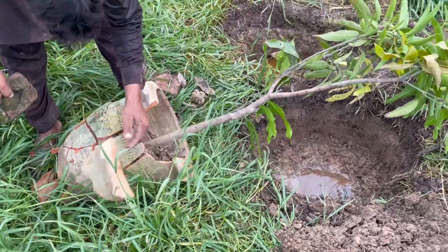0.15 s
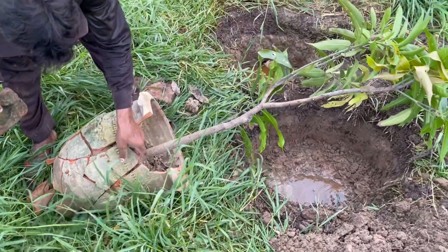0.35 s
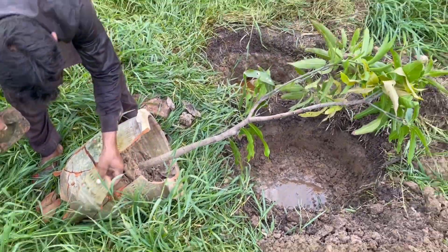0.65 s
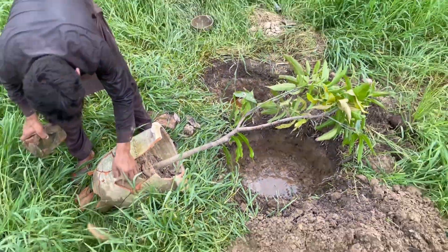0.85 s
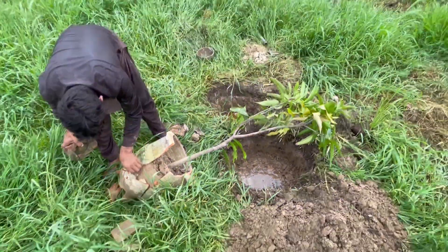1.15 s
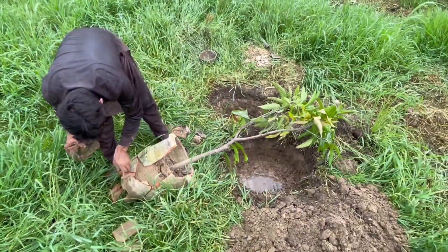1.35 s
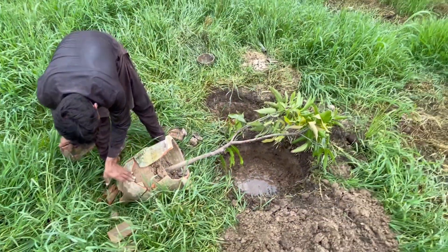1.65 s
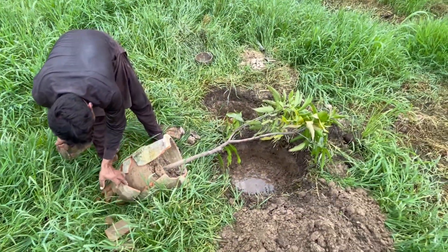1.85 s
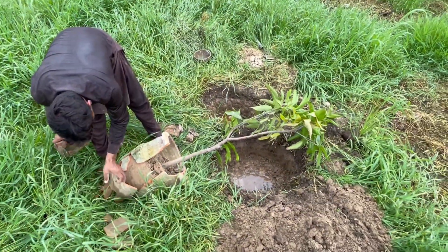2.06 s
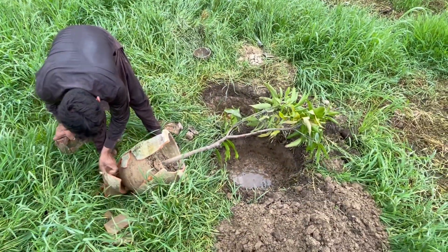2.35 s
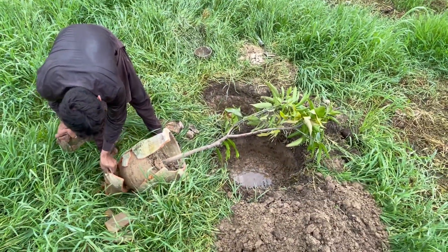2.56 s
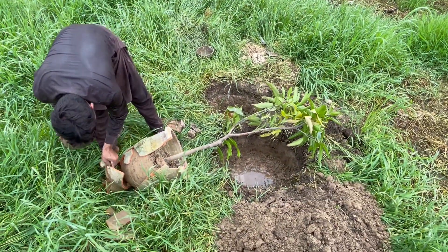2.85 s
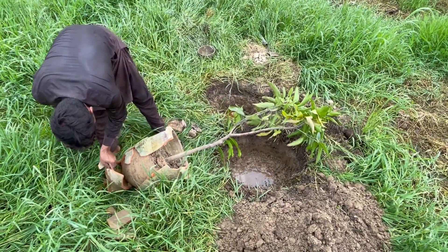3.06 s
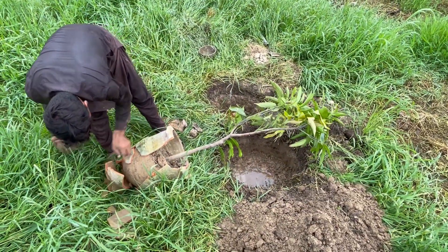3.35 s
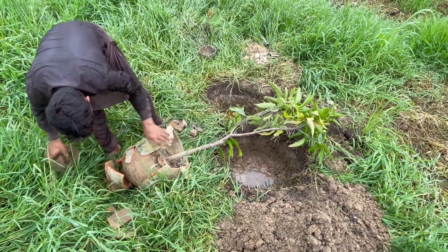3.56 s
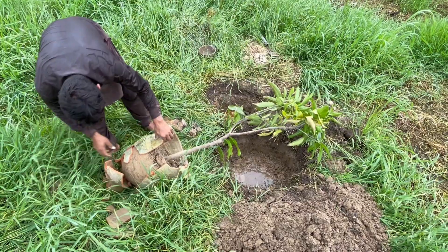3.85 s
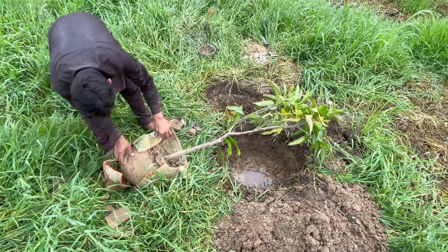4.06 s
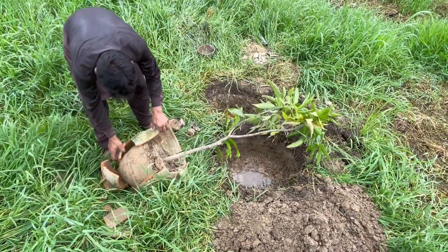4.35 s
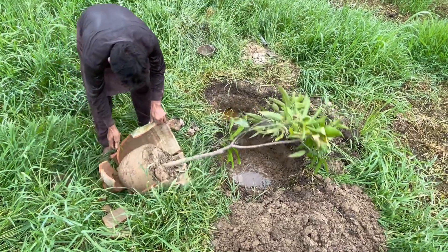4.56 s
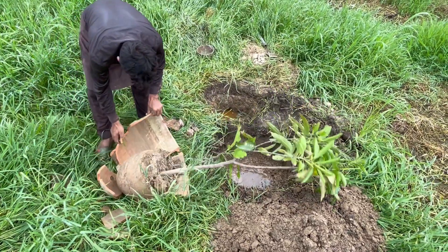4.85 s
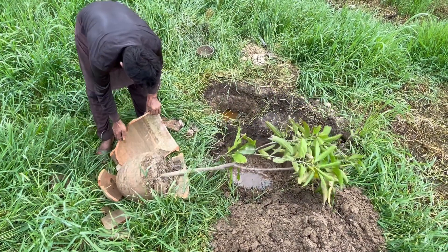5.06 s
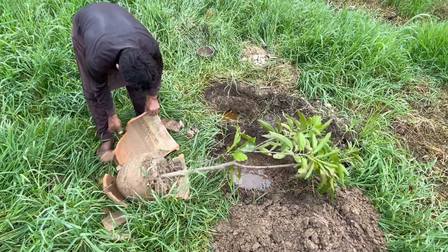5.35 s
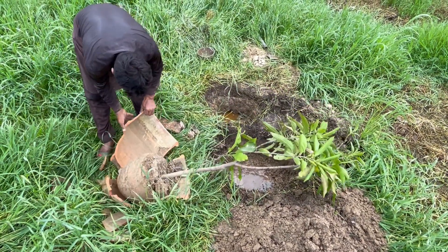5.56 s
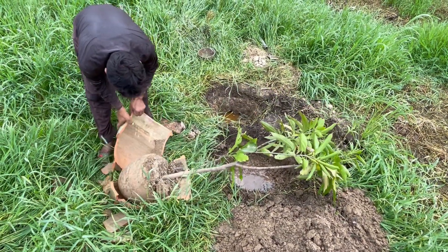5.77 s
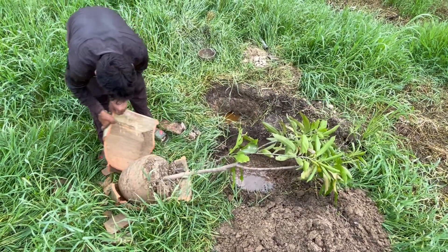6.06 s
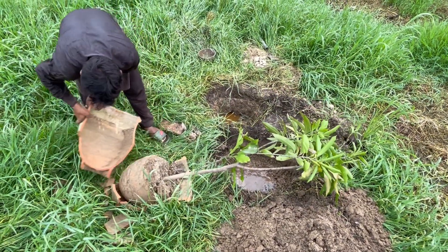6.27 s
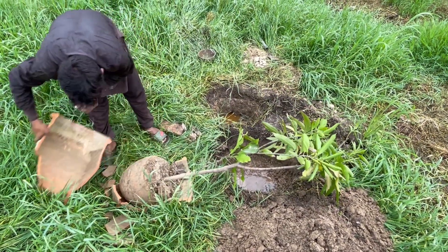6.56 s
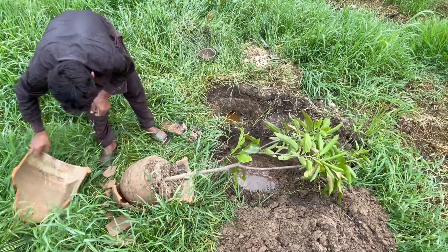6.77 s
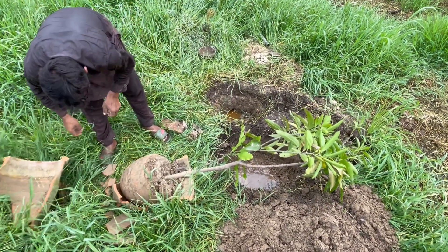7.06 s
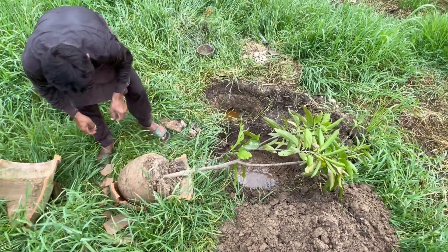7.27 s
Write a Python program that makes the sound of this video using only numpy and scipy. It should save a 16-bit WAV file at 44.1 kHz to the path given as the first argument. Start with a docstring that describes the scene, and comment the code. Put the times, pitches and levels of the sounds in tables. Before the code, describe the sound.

Hands pry pieces from a broken terracotta pot on a quiet farm. One bright, dry clink comes first, then earthy knocks, brief scrapes and pattering soil, with another sharp crack past the middle. After two short nasal bird calls, the large half is thrown into the grass with a heavy ceramic clatter and a spill of crumbs. Low distant engine hum, high insect hiss and open air surround the close stereo sound.

```python
"""Cracked clay pot pulled apart in long grass

Hands work at the pot: shards clink and knock as dying modes under a gritty crunch, soil crumbles as a patter
of rasping crumbs, and the big half is tossed down and rocks to rest. Swishing grass, insects and distant air
are shaped noise; a small bird calls in sliding harmonics; an engine and a low hum drone far off as wavering
tones. A handheld two-port microphone hears each layer with its own phase and level between the ports."""
import sys
import numpy as np
from scipy import signal
from scipy.fft import rfft, irfft
from scipy.io import wavfile
from scipy.ndimage import uniform_filter1d

SR = 44100
rng = np.random.default_rng(int(sys.argv[2]) if len(sys.argv) > 2 else 0)


def digitize_waveform(pressure):
    """Quantize a signal to 16-bit integers and store it at the path in sys.argv[1].

    Rows of a 2-D input are taken as channels; values are limited to [-1, 1].
    """
    field = np.atleast_2d(pressure).T
    bounded = np.clip(field, -1, 1)
    quanta = np.round(bounded * 32767).astype(np.int16)
    wavfile.write(sys.argv[1], SR, quanta)


N = 326781  # length [samples]
HZ = np.fft.rfftfreq(1024, 1 / SR)  # noise bins [Hz]
FRAMES = np.arange(N // 256 + 5) * 256 / SR  # noise frames [s]

# Distant rumble and hush, a relative spectrum set to AIR_DB overall: (frequency [Hz], density [dB per Hz])
AIR = [(15, -43), (25, -12), (107, 3), (220, -17), (680, -24), (1280, -32), (1810, -27), (2610, -31),
       (4130, -42), (4500, -41), (5850, -44), (9900, -120)]
AIR_DB = -51
# Insect bands without a pulse: (frequency [Hz], width [Hz], level [dB])
CHORUS = [(7510, 287, -60.5), (9750, 290, -56.5), (10570, 240, -68), (6200, 1800, -81)]
# Insect band that swells and fades: (frequency [Hz], width [Hz], level at THROB_TOP_S [dB])
THROB = [(5483, 252, -56.5)]
THROBS_PER_S, THROB_TOP_S = 1.72, 4.08
THROB_DEPTH_DB, THROB_GROWTH_DB = 7.5, 0.83  # dip between swells [dB], steady growth [dB per s]
# A soft hiss rises and sinks: (time [s], level [dB])
SWELLS = [(3.48, -61.5), (4.93, -60.5), (5.549, -62)]
SWELL_HZ, SWELL_WIDTH_HZ, SWELL_S = 3040, 370, 0.096
# Grass colour, relative: (frequency [Hz], density [dB per Hz])
GRASS = [(300, 0.5), (1500, -3.5), (3000, -5), (8000, -0.5), (11400, 4.5), (12600, -24), (16500, -40)]
# Hands and feet brush the grass: (peak time [s], level in 10.5-12.5 kHz [dB], swell and fade [s])
SWISHES = [(0.366, -52, 0.037), (.62, -60, 0.14), (.93, -50, 0.031), (1.62, -62.5, 0.075),
           (3.34, -61, 0.21), (3.73, -49, 0.088), (4.12, -60, 0.12), (4.4, -55, 0.072), (4.74, -57.5, 0.31),
           (5.45, -55.5, 0.075), (5.82, -60.5, 0.089), (6.22, -65, .15), (6.73, -47, 0.059),
           (6.95, -56.5, 0.24), (7.35, -59.5, 0.15)]
STIR_DB = -88  # the grass never lies quite still

# Low hum: (time [s], level [dB])
HUM = [(0, -71), (2.402, -60), (2.8, -53.5), (4.2, -47.5), (4.7, -56), (5.4, -55), (5.9, -51.5), (6.5, -55),
       (7.41, -56)]
HUM_HZ = 64.7
# Far engine: (time [s], cycle rate [Hz], level [dB])
ENGINE = [(0, 30.7, -76), (.6, 30.5, -52.5), (1.2, 29.4, -53), (1.6, 30, -74), (2.3, 37.3, -55.5),
          (2.75, 34.4, -48.5), (3.05, 33.2, -57), (3.55, 36.7, -49), (4.4, 32, -53), (4.8, 29, -49),
          (5.7, 27.2, -53), (6.2, 23, -58.5), (7.41, 20.2, -56.5)]
# Engine orders: (multiple of the cycle, relative level [dB])
ORDERS = [(3, -5), (4, 0.5), (5, -12.5)]
BOOM_HZ, BOOM_WIDTH_HZ, BOOM_DB = 100.2, 1.7, 8  # the exhaust lifts whichever order passes its note

# Bird calls: (time [s], level [dB], pitch [Hz], change of the late notes [dB], brightness [dB per harmonic])
CALLS_OF_BIRD = [(5.716, -49, 1426, -1, -0.5), (6.148, -46.5, 1440, -1.5, 0)]
# Notes of one call: (delay [s], relative level [dB], length [s])
NOTES = [(0, 0, .056), (0.064, -1.5, .046), (0.19, -11, .053), (.325, -20.5, 0.051)]
LATE_S = .1  # notes delayed more than this are late ones
# Voice of the bird: (harmonic, relative level before brightness and fading [dB])
BEAK = [(1, -9.5), (2, 2.5), (3, -3), (4, 4.5), (5, -0.5), (6, -10)]

# Dull low bumps, one of them the low body of a pot knock: (time [s], level [dB], frequency [Hz], t60 [s])
THUMPS = [(0.384, -36, 51, 0.13), (0.503, -19, 55, 0.06), (1.443, -36, 247, 0.078),
          (1.568, -31.5, 66.4, 0.14), (1.832, -31.5, 53.2, 0.28), (1.869, -37.5, 89.5, 0.29),
          (2.093, -28, 64.5, 0.26), (2.748, -37, 125, 0.28), (4.019, -31.5, 109.1, 0.17),
          (6.689, -43, 62, 0.33), (6.75, -37, 72, 0.14)]
# Soil colour, relative: (frequency [Hz], density [dB per Hz])
SOIL = [(150, 16.5), (400, 7), (900, 0.5), (1500, 8.5), (2000, 2), (3000, 1), (4300, -10.5), (7000, -8),
        (12000, -70)]
# Soil crumbling in the hands: (time [s], level [dB])
CRUMBLING = [(0, -100), (.76, -100), (.95, -60), (1.1, -54.5), (1.5, -60), (1.88, -51), (2.05, -52),
             (2.23, -52), (2.4, -57), (3.1, -56), (3.55, -63), (4.2, -52), (4.66, -53), (5.2, -60.5),
             (5.76, -60.5), (6.08, -52), (6.5, -65.5), (7.41, -61.5)]
SPILL_S, SPILL_DB, SPILL_RISE_S, SPILL_T60_S = 6.69, -37, 0.024, 0.75  # the landing shakes soil off the big half
# Ring of the pot: (frequency [Hz], relative level [dB], t60 [s])
POT = [(300, -10, .03), (470, -8, .03), (732, -6, .035), (920, -5, .035), (1061, -5, .03), (1250, -5, .035),
       (1540, -7, .035), (2083, -4, .03), (2400, -7, .025), (2875, -6, .025), (3257, -7, .022),
       (3600, -10, .022), (4700, -13, .02), (6966, -20, .025), (7900, -20, .025)]
# Crunch of rough clay, relative: (frequency [Hz], density [dB per Hz])
GRIT = [(40, -18), (150, -15), (400, -4), (1100, -7.5), (2300, 0), (3500, -5.5), (5000, -12.5), (8000, -13),
        (12000, -16.5), (16500, -40)]
LUMPS_DB, LUMP_S = 4, 0.0024  # rough edges catch and slip, so the crunch comes in grains

# Single clear notes ring in and between the knocks: (time [s], level [dB], frequency [Hz], t60 [s])
CLEAR_NOTES = [(1.034, -45, 1545, .25), (1.445, -26, 3265, .035), (1.445, -28, 2875, .035),
               (1.444, -23, 1535, .04), (5.108, -39, 1300, .07), (4.668, -42, 480, .1),
               (1.303, -37, 7030, .045), (1.961, -42, 4690, .04), (1.989, -43, 6510, .03),
               (2.026, -44, 4750, .03), (2.208, -43, 6500, .04), (2.842, -37, 3550, .045),
               (2.842, -37, 2500, .045), (3.179, -42, 8030, .02), (3.1956, -34, 7890, .05),
               (3.197, -38, 3100, .04), (3.23, -41, 7900, .04), (4.364, -36, 7100, .02),
               (4.433, -38, 6300, .02), (4.433, -36, 3400, .03), (6.81, -40, 5300, .04)]
# Pieces still held in soil knock together:
# (time [s], level [dB], added note [Hz], its level against the knock [dB], hardness [dB per octave])
KNOCKS = [(0.468, -34.5, 857, -7.5, 3), (0.473, -35.5, 560, -4, -21), (0.5095, -30, 600, -10, -2),
          (.99, -34, 3630, -8, 2), (1.134, -40.5, 930, -2, 2), (1.179, -35, 1516, -2, -3),
          (1.296, -40.5, 880, -4, -6), (1.443, -18, 1027, -9.5, -1.5), (1.4446, -17, 2120, 2, -1),
          (1.513, -36.5, 2040, -2, 3), (1.555, -31, 917, -10.5, 2.5), (1.841, -30, 1510, -5, -4.5),
          (1.881, -39, 1200, -12, -19), (1.913, -40, 644, -2, 1), (1.942, -41.5, 804, -1, -4),
          (1.962, -45, 860, -2, -2), (1.986, -41, 820, 3.5, -1), (2.016, -34.5, 927, -3, 2),
          (2.028, -31.5, 990, -12, -1.5), (2.175, -39, 1255, -4, 0), (2.205, -35, 945, -17, -3.5),
          (2.486, -37.5, 1254, -1.5, -5.5), (2.839, -29, 1253, -5.5, 20), (2.847, -30.5, 730, -9, 2),
          (3.116, -32.5, 1252, -2.5, -8.5), (3.179, -37.5, 740, -6, -5), (3.197, -30, 2460, 2, -1.5),
          (3.199, -29.5, 1510, 5.5, -7), (3.219, -34.5, 1235, -14, 1), (3.265, -37, 747, -8, -7.5),
          (4.242, -35, 1301, -13, -5), (4.267, -35.5, 760, -16, 0), (4.327, -43.5, 650, -2, -8),
          (4.345, -40, 2830, 1, 1), (4.364, -17.5, 4770, -3.5, -0.5), (4.374, -28, 930, 0, -8.5),
          (4.388, -30.5, 4490, -5, -9), (4.424, -38, 610, -2, -10), (4.433, -29.5, 910, -4.5, -1),
          (4.472, -38, 1550, -7, -3), (4.522, -39, 1280, -9, -4), (4.559, -35.5, 1262, 6, -1),
          (4.619, -34.5, 1317, -13, -1), (4.658, -37.5, 950, -6, 3), (4.668, -38, 1290, 1, -4.5),
          (4.688, -42.5, 960, 1, -5), (4.795, -42, 1290, 2, 1), (4.824, -39.5, 1291, -3, 11),
          (5.107, -31.5, 2708, -4, 8)]
KNOCK_T60_S, RING_SHORTENS = 0.047, 0.49  # t60 at 1 kHz; it goes as pitch to the minus RING_SHORTENS
KNOCK_GRIT_DB, KNOCK_GRIT_T60_S = -2, 0.055
SOIL_DAMPS_HZ = 6300  # packed soil cushions the knocks and dulls their treble
# A small free shard is struck: (time [s], peak [dB])
SHARD_BLOWS = [(.578, -42), (0.9276, -5.5)]
# Ring of the shard: (frequency [Hz], relative level [dB], t60 [s])
SHARD = [(506, -30, 0.014), (910, -8, 0.0076), (1153, 13.5, 0.008), (1546, -6, 0.097), (2160, -23, .12),
         (2516, -2, 0.15), (3080, -9.5, 0.11), (3625, -8.5, 0.063), (3740, -21, 0.093), (4150, -8, 0.056),
         (4700, -11, 0.035), (5150, -4.5, 0.024), (5980, 0, 0.027), (7740, -13.5, 0.019),
         (8660, -13, 0.014)]
# The big half lands, rocks and settles: (time [s], peak [dB], lift of the middle modes [dB],
# hardness [dB per octave], grit [dB], grit t60 [s])
HALF_BLOWS = [(6.686, -6.5, -5, 0, -4, 0.03), (6.6908, -9.5, -5, -2.5, -10, 0.061),
              (6.712, -20, -9, -3, -3.5, 0.18), (6.7365, -11, 11, -3, -8.5, 0.049),
              (6.7435, -11.5, 13.5, -2.5, -9.5, 0.059), (6.751, -10, 5, -4.5, -17, 0.067),
              (6.762, -29, -2, -1, 4, 0.051), (6.766, -32, -4, -3.5, 2, 0.023),
              (6.789, -32, -4, -0.5, 0, 0.15), (6.81, -35.5, 3, -2, 6, 0.067),
              (6.866, -25.5, -12, -6.5, -22, 0.054)]
# Ring of the big half: (frequency [Hz], relative level [dB], t60 [s])
HALF = [(187.3, -6.5, 0.045), (285, 0, 0.051), (336, -18, 0.42), (394, 5, 0.05), (447, 1.5, 0.05),
        (562, -2, 0.024), (696, -12, 0.083), (880, -3.5, 0.063), (1023, -4.5, 0.097), (1236, -2.5, 0.13),
        (1378, -16, 0.27), (1970, -5, 0.07), (2400, -15.5, 0.18), (2600, -9, 0.057), (3400, -0.5, 0.032),
        (4070, -12, 0.046), (4370, -11, 0.044), (4720, -2, 0.047), (5330, -4, 0.047), (6440, -13, 0.039)]
MIDDLE_HZ, MIDDLE_OCTAVES = 920, 0.4  # blows on the rim reach these modes best
CHATTER_DB, CHATTER_S = 3.2, .012  # the rocking half touches grass and soil, so each mode flutters

# Port pair for the open field: (frequency [Hz], left leads [rad], left-right [dB], likeness [0-1])
FIELD = [(29.8, -1.5, -2, 0.54), (65, 0.5, 3, 0.84), (191, 0.34, 2, 0.84), (725, 1.1, 2, 0.7),
         (2140, 1.44, 0.5, 1), (5500, 0.89, 2, 0.053), (8850, 1.5, 0, 1), (9315, -2.5, -2, 0.8),
         (9710, -2.5, 1, 1), (11680, -5, 0, 0.55), (16500, -1, -1, 0.63)]
# Port pair for the work nearby: (frequency [Hz], left leads [rad], left-right [dB])
NEAR = [(50, 0, 3), (350, .8, 5), (800, 1.8, 12), (1300, 2.3, 7), (1900, 3.1, -3), (2400, 6.3, 0),
        (3200, 7.9, 4), (4500, 12, 3), (6000, 13.5, 3), (8600, 18.9, -2), (12000, 12.6, 0), (16500, 4.2, 0)]
# Bumps reach the two ports unevenly: (frequency [Hz], left leads [rad], left-right [dB])
BODY = [(30, 1.2, 0), (150, 0.9, 6)]
# The pickup narrows early on, then opens: (time [s], narrow share [0-1])
NARROW = [(0, 0.16), (.45, 0.84), (.86, 0.18), (.915, 0.14)]
ECHO_DB, ECHO_T60_S = -6, 0.041  # ground, legs and stems scatter the nearby sound, differently to each port
# Overall tone, the lowest bass and the top treble softened: (frequency [Hz], gain [dB])
TONE = [(20, -8), (40, -1), (12300, 1.5), (13300, -17), (16500, -9)]
EDGE_HZ = 16000  # top of the band


def amp(db):
    """Amplitude from decibels."""
    return 10 ** (np.asarray(db) / 20)


def evened(x):
    """Scales to an RMS of 1."""
    return x / np.sqrt(np.mean(abs(x) ** 2) + 1e-20)


def read(rows, at, warp=np.log1p):
    """Every column of a table at the given places."""
    key, *columns = np.transpose(rows)
    return np.array([np.interp(warp(at), warp(key), c) for c in columns])


def add(mix, s, sound):
    """Lays a sound into the mix at a time in seconds."""
    part = mix[round(s * SR):][:len(sound)]
    part += sound[:len(part)]


def wander(shape, size):
    """Smooth random drift of RMS 1, averaged twice over so many samples."""
    once = uniform_filter1d(rng.standard_normal(shape), size)
    return evened(uniform_filter1d(once, size))


def colour(x, rows, tilt=0):
    """Filters by a table of (frequency [Hz], gain [dB]) and a tilt in dB per octave."""
    hz = np.fft.rfftfreq(x.shape[-1], 1 / SR)
    gain_db = read(rows, hz)[0] + tilt * np.log2((hz + 200) / 1200)
    return irfft(rfft(x) * amp(gain_db), x.shape[-1])


def ports(x, pair):
    """One sound as the two ports hear it: shifted apart, their sum kept level unless they nearly cancel."""
    lead, balance_db = read(pair, np.fft.rfftfreq(N, 1 / SR))[:2]
    half = amp(balance_db / 2) * np.exp(.5j * lead)
    level = np.maximum(abs(half + 1 / half) / 2, .5)
    return irfft(rfft(x) * np.array([half, 1 / half]) / level, N)


def field_noise(level, patchy_db):
    """Noise of the given level (bins x frames) with drifting patches, partly alike at both ports."""
    a, b, c, d, patches = rng.standard_normal((len(FRAMES), len(HZ), 5)).T
    patches = uniform_filter1d(patches, size=8, axis=0)
    patches = evened(uniform_filter1d(patches, size=10, axis=1))
    lead, balance_db, like = read(FIELD, HZ)[:, :, None]
    like = np.clip(like + (1 - like) * read(NARROW, FRAMES, np.asarray), 0, 1)
    right = a + 1j * b
    left = (like * right + np.sqrt(1 - like ** 2) * (c + 1j * d)) * np.exp(1j * lead)
    pair = np.array([left * amp(balance_db / 2), right / amp(balance_db / 2)])
    pair = pair * level * amp(patchy_db * patches)
    unit = 1 / np.sqrt(np.mean(signal.istft(right, nperseg=1024, noverlap=768)[1] ** 2))
    return unit * signal.istft(pair, nperseg=1024, noverlap=768)[1][:, :N]


def insect_band(hz, width):
    """A bell-shaped noise band; its power has the given standard deviation in Hz."""
    return evened(np.exp(-.25 * ((HZ - hz) / width) ** 2))[:, None]


def insects():
    """Power of the insect bands, one of them throbbing and growing, and of the soft hiss."""
    power = sum((amp(db) * insect_band(hz, width)) ** 2 for hz, width, db in CHORUS)
    since_top = FRAMES - THROB_TOP_S
    swell_db = THROB_DEPTH_DB * (np.cos(2 * np.pi * THROBS_PER_S * since_top) - 1) / 2
    swell_db += THROB_GROWTH_DB * since_top
    for hz, width, db in THROB:
        power = power + (amp(db + swell_db) * insect_band(hz, width)) ** 2
    for s, db in SWELLS:
        hiss = amp(db) * insect_band(SWELL_HZ, SWELL_WIDTH_HZ)
        power = power + hiss ** 2 * np.exp(-((FRAMES - s) / SWELL_S) ** 2)
    return power


def swishing(t):
    """Each swish swells and fades evenly about its peak, over a faint stir."""
    swishes = sum(amp(db - 9.1 * (abs(t - s) / span) ** 0.73) ** 2 for s, db, span in SWISHES)
    return np.sqrt(amp(STIR_DB) ** 2 + swishes)


def field():
    """Rumble, insects and swishing grass add as powers."""
    air = amp(AIR_DB) * evened(amp(read(AIR, HZ).T))
    grass = amp(read(GRASS, HZ).T)
    top = (HZ > 10500) & (HZ < 12500)  # the band that sets the grass level
    grass = grass / np.sqrt(np.mean(top * grass[:, 0] ** 2)) * swishing(FRAMES)
    return field_noise(np.sqrt(air ** 2 + insects() + grass ** 2), patchy_db=2.1)


def hum():
    """One low tone, unsteady in pitch and level."""
    turns = np.cumsum(HUM_HZ * (1 + 0.0394 * wander(N, size=9000))) / SR
    level_db = read(HUM, np.arange(N) / SR, np.asarray)[0] + 3.15 * wander(N, size=5000)
    return np.sqrt(2) * amp(level_db) * np.sin(2 * np.pi * turns)


def engine():
    """Low orders of the firing cycle, wavering a little in pitch; the exhaust note boosts them in passing."""
    hz, level_db = read(ENGINE, np.arange(N) / SR, np.asarray)
    turns = np.cumsum(hz * (1 + 0.007 * wander(N, size=2500))) / SR
    out = np.zeros(N)
    for k, db in ORDERS:
        boom_db = BOOM_DB * np.exp(-.5 * ((k * hz - BOOM_HZ) / BOOM_WIDTH_HZ) ** 2)
        tone = np.sin(2 * np.pi * (round(k) * turns + rng.random()))
        out += np.sqrt(2) * amp(level_db + db + boom_db) * tone
    return out


def bird_note(hz, length, bright_db, lift=.04, fall=.33, knee=3.0):
    """A nasal note that starts a little flat, holds, then slides down; the upper harmonics fade first."""
    u = np.arange(round(length * SR)) / (length * SR)  # 0-1 through the note
    turns = np.cumsum(hz * (1 - lift * np.exp(-u / 0.13) - fall * u ** knee)) / SR
    note = 0
    for k, db in BEAK:
        fade_db = (15.0 + 24.0 * (k > 3)) * u ** 2.0
        note = note + amp(db + bright_db * k - fade_db) * np.sin(2 * np.pi * k * turns)
    return evened(note) * signal.windows.tukey(len(u), .45)


def bird():
    """Calls of several notes, with a noise-like tail of echoes thrown back by the bushes."""
    out = np.zeros(N)
    for s, db, hz, late_db, bright_db in CALLS_OF_BIRD:
        for lag, note_db, length in NOTES:
            level = amp(db + note_db + late_db * (lag > LATE_S))
            add(out, s + lag, level * bird_note(hz, length, bright_db))
    echoes = rng.standard_normal(9000) * amp(-60 * np.arange(9000) / SR / 0.24)
    return out + amp(-3.5) * signal.oaconvolve(out, echoes / np.linalg.norm(echoes))[:N]


def thumps():
    """Each bump is a soft low push: a sine that rises fast and dies away."""
    out, t = np.zeros(N), np.arange(SR // 2) / SR
    for s, db, hz, t60 in THUMPS:
        push = amp(db - 60 * t / t60) * (1 - np.exp(-t / 0.0035))
        add(out, s, push * np.sin(2 * np.pi * hz * t))
    return out


def crunch(t, hardness, t60):
    """Grainy noise of rough clay edges; a longer scrape starts softer."""
    grit = colour(rng.standard_normal(len(t)), GRIT, hardness)
    grit = grit * amp(-60 * t / t60) * (1 - np.exp(-t / (0.037 * t60)))
    return grit * amp(LUMPS_DB * wander(len(t), round(LUMP_S * SR)))


def ring(modes, peak_db, hardness, grit_db, grit_t60, scatter_db, detune=0, rise_cycles=0.14, chatter_db=0,
         count=12000):
    """One blow: dying modes, unevenly excited, over the crunch of rough edges."""
    t = np.arange(count) / SR
    hz, db, t60 = np.transpose(modes)[:, :, None]
    hz = hz * (1 + detune * rng.standard_normal(hz.shape))
    db = db + hardness * np.log2(hz / 1000) + scatter_db * rng.standard_normal(hz.shape)
    tones = amp(db - 60 * t / t60) * np.sin(2 * np.pi * (hz * t + rng.random(hz.shape)))
    if chatter_db:
        tones = tones * amp(chatter_db * wander(tones.shape, round(CHATTER_S * SR)))
    tones = (tones * (1 - np.exp(-t * hz / rise_cycles))).sum(0)
    grit = crunch(t, hardness, grit_t60)
    sound = tones / abs(tones).max() + amp(grit_db) * grit / abs(grit).max()
    return amp(peak_db) * sound / abs(sound).max()


def crumbling(t):
    """The hands work the soil loose; the landing spills what is left."""
    after = np.maximum(t - SPILL_S, 0)
    spill = amp(SPILL_DB - 60 * after / SPILL_T60_S) * (1 - np.exp(-after / SPILL_RISE_S))
    return np.hypot(amp(read(CRUMBLING, t, np.asarray)[0]), spill)


def soil(per_s=450, spread_db=2.5, ring_db=-6.0):
    """Crumbs of uneven size patter down; each rasps briefly and sets the pot ringing."""
    sizes = amp(spread_db * np.minimum(rng.exponential(1, N), 4))
    crumbs = sizes * (rng.random(N) < per_s / SR) * rng.choice([-1, 1], N)
    pot = signal.oaconvolve(crumbs, ring(POT, 0, -1.9, -68, 1, 0, count=4000))[:N]
    fade = amp(2 * -60 * np.arange(800) / SR / 0.15)  # power fade of one rasp
    rasp_level = np.sqrt(abs(signal.oaconvolve(crumbs ** 2, fade)[:N]))
    rasp = colour(rasp_level * rng.standard_normal(N), SOIL)
    patter = evened(rasp) + amp(ring_db) * evened(pot)
    return evened(patter) * crumbling(np.arange(N) / SR)


def clear_notes():
    """Single clear notes in and between the knocks: each one dying mode with a gritty tick."""
    out = np.zeros(N)
    for s, db, hz, t60 in CLEAR_NOTES:
        add(out, s, ring([(hz, 0, t60)], db, 0, grit_db=0.0, grit_t60=0.009, scatter_db=0, rise_cycles=0.87,
                         count=6000))
    return out


def knocks():
    """Held pieces ring on the pot's modes, dulled by soil, with one added note of its own level."""
    out = np.zeros(N)
    for s, db, hz, note_db, hardness in KNOCKS:
        # detuned because pieces differ in size
        body = ring(POT, db - 3.5, hardness, KNOCK_GRIT_DB, KNOCK_GRIT_T60_S, scatter_db=5.0, detune=0.013,
                    rise_cycles=0.19, count=6000)
        add(out, s, signal.lfilter(*signal.butter(2, SOIL_DAMPS_HZ, fs=SR), body))
        note = (hz, 0, KNOCK_T60_S * (hz / 1000) ** -RING_SHORTENS)  # higher notes die sooner
        add(out, s, ring([note], db - 2.5 + note_db, 0, -54, 1, 0, rise_cycles=0.22, count=6000))
    return out


def shard():
    """The free shard clinks: its modes build over a few cycles, then die."""
    out = np.zeros(N)
    for s, db in SHARD_BLOWS:
        add(out, s, ring(SHARD, db, 0, grit_db=-8.5, grit_t60=0.033, scatter_db=2.3, rise_cycles=2.9))
    return out


def big_half():
    """The big half lands and rocks: each blow lifts or spares the middle modes, and all of them flutter."""
    out = np.zeros(N)
    for s, db, lift_db, *touch in HALF_BLOWS:
        modes = []
        for hz, mode_db, t60 in HALF:
            octaves = np.log2(hz / MIDDLE_HZ)
            modes.append((hz, mode_db + lift_db * np.exp(-.5 * (octaves / MIDDLE_OCTAVES) ** 2), t60))
        add(out, s, ring(modes, db, *touch, scatter_db=1.5, detune=0.0017, chatter_db=CHATTER_DB, count=9000))
    return out


def scene():
    """Field and far sources behind, pot and soil close by with scattered early echoes."""
    background = field() + ports(engine() + hum() + bird(), FIELD)
    near = soil() + clear_notes() + knocks() + shard() + big_half()
    narrow = read(NARROW, np.arange(N) / SR, np.asarray)
    echoes = rng.standard_normal((2, 3000)) * amp(-60 * np.arange(3000) / SR / ECHO_T60_S)
    echoes = echoes / np.linalg.norm(echoes[0])
    scattered = amp(ECHO_DB) * signal.oaconvolve(near[None], echoes, axes=1)[:, :N]
    direct = narrow * ports(near, FIELD) + (1 - narrow) * ports(near, NEAR)
    return background + ports(thumps(), BODY) + direct + scattered


def record(dry):
    """Overall tone by frequency, then the band limit."""
    band_limit = signal.firwin(511, EDGE_HZ, window=("kaiser", 9), fs=SR)
    return signal.oaconvolve(colour(dry, TONE), band_limit[None], "same")


dry = scene()
out = record(dry)
digitize_waveform(out)
```